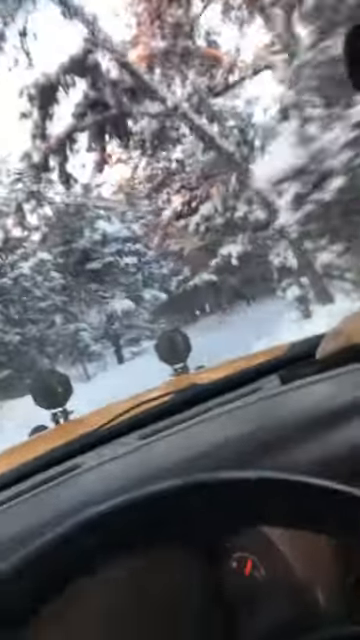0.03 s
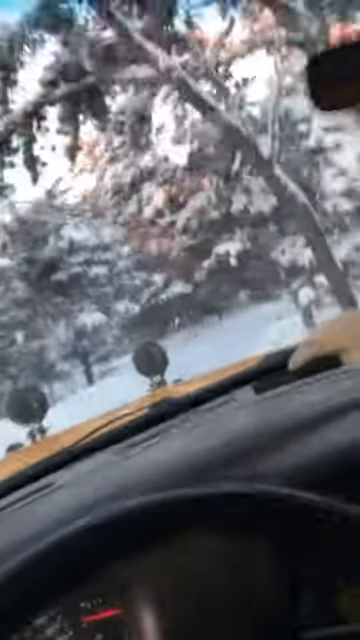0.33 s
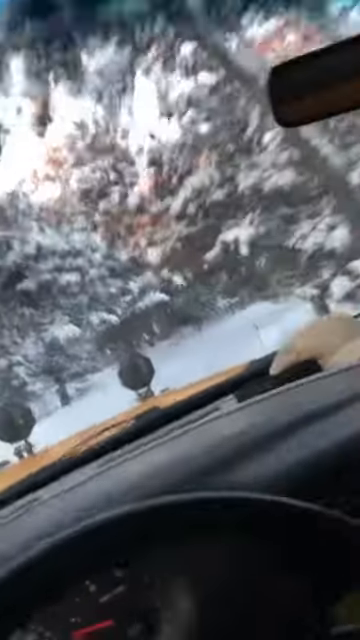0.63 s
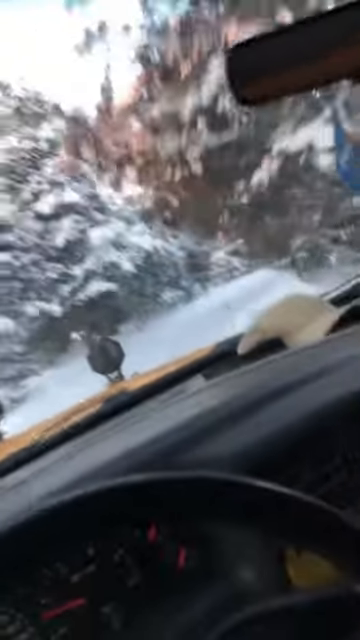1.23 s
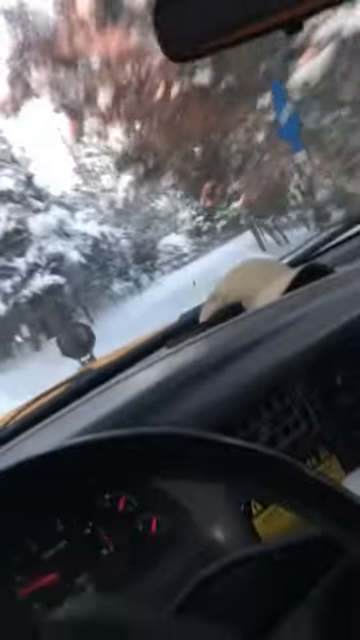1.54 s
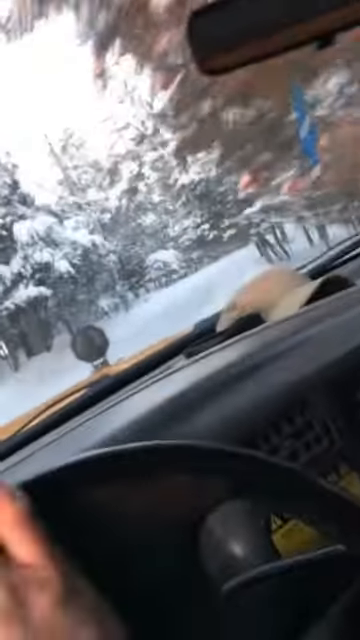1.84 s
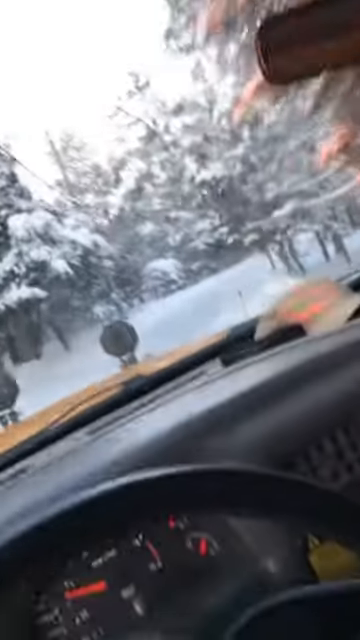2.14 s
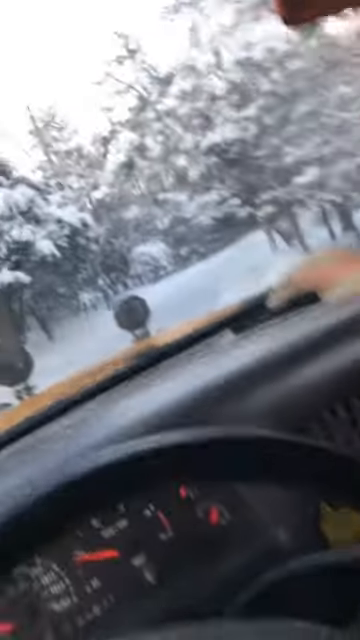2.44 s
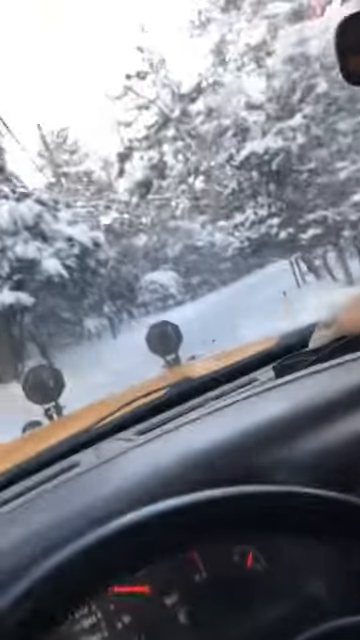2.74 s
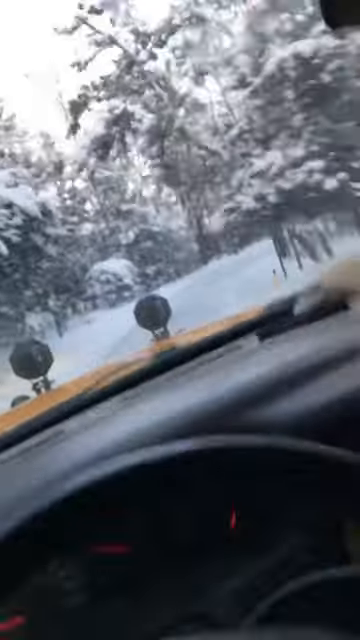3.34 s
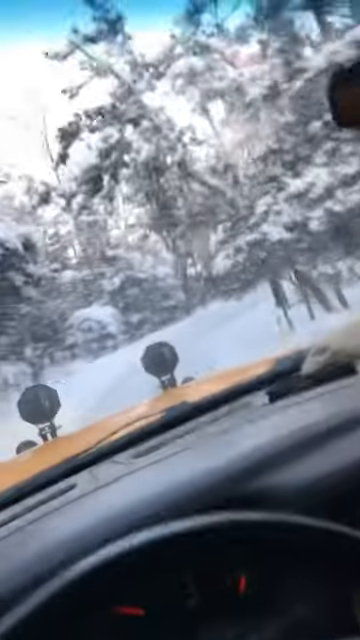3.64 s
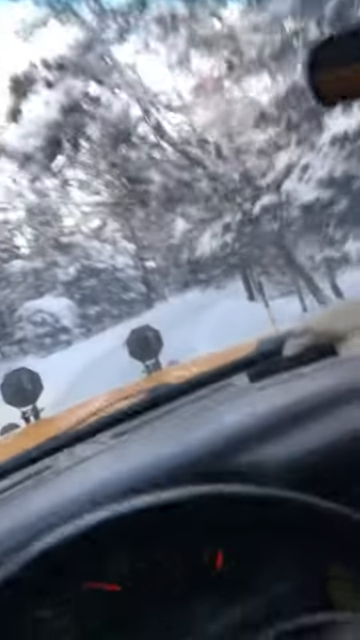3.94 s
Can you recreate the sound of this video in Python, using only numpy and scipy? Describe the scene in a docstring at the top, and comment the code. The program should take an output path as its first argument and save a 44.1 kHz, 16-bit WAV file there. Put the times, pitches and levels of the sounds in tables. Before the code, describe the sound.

A truck engine throbs low, heard from inside the cab on a snowy track, then revs up halfway and pulls. Bumps boom, loose fittings rattle, trim chirps, and a rush of air and snow swells.

```python
"""Inside the cab of a plow truck on a snowy track, the engine throbs slowly, then revs up and pulls.
The cab rumbles, growls and booms over bumps, and the belt-driven fan hums along with the engine.
The rush of air and snow swells as the truck speeds up. Loose fittings rattle, rubbing trim chirps,
and something brushes softly close by."""
import sys
import numpy as np
from scipy import signal
from scipy.fft import rfft, irfft, next_fast_len
from scipy.io import wavfile
from scipy.ndimage import uniform_filter1d, map_coordinates

SR = 44100
rng = np.random.default_rng(int(sys.argv[2]) if len(sys.argv) > 2 else 0)


def put_to_file(sound):
    """Save the sound as 16-bit audio at rate SR, in the file named by the first command-line argument."""
    columns = np.atleast_2d(sound).T  # one column per channel
    safe = np.clip(columns, -1, 1)
    whole_steps = np.round(safe * 32767)
    wavfile.write(sys.argv[1], SR, whole_steps.astype(np.int16))


N = 176400


# How often the engine fires (time [s], firing rate [Hz])
FIRING_RATE = [(0, 43.95), (.45, 42.99), (1.15, 43.84), (1.62, 43.48), (1.76, 46.26), (1.86, 53.77),
               (1.96, 64.74), (2.06, 66.86), (2.3, 68.78), (2.65, 69.83), (2.85, 73.16), (3.05, 75.55),
               (3.2, 77.3), (3.4, 76.23), (3.75, 80.6), (4, 81.6)]
def engine_speed(idle_hz=42.7, pull_hz=70.4):
    """The phase turns once per firing; pull goes from 0 (idling) to 1 (working hard)."""
    rate = curve(FIRING_RATE)
    phase = 2 * np.pi * np.cumsum(rate) / SR
    pull = np.clip((rate - idle_hz) / (pull_hz - idle_hz), 0, 1)
    return phase, pull


# How loud the engine's lowest tone is (time [s], level [dB])
THROB_LEVEL = [(0, -18), (.12, -14.5), (.8, -14.5), (1.25, -14.5), (1.65, -13.5), (1.88, -20), (2.03, -18),
               (2.55, -19.5), (2.8, -17.5), (2.95, -14), (3.3, -15.5), (3.6, -16.5), (3.8, -18.5),
               (3.9, -29), (4, -18)]
# Its higher tones (multiple of the firing rate, idling level [dB], pulling level [dB])
ENGINE_OVERTONES = [(2, -22, -34), (3, -63, -58), (4, -38, -54.5), (5, -34.5, -65)]
def engine(phase, pull, jitter_rad=0.15):
    """Uneven firings throb in the cab; most of the higher tones fade as the engine speeds up."""
    phase = phase + jitter_rad * wobble(14)
    out = amp(curve(THROB_LEVEL) + 1.36 * wobble(22.24)) * unit(np.cos(phase))
    for multiple, idle_db, pull_db in ENGINE_OVERTONES:
        level_db = blend(idle_db, pull_db, pull) + 1.6 * wobble(8.1)
        out += amp(level_db) * unit(np.cos(multiple * phase))
    return out


# The rumble while idling (frequency [Hz], relative level [dB])
IDLE_SPECTRUM = [(12, -36), (20, -11), (27, 5.5), (37, 3), (60, 1.5), (76, -2.5), (100, -14), (130, -12.5),
                 (200, -16), (250, -16.5), (310, -19), (400, -27), (600, -38), (1200, -82)]
# The rumble while pulling (frequency [Hz], relative level [dB])
PULL_SPECTRUM = [(12, -36), (20, -10), (30, 7), (40, 5.5), (60, 0), (80, -4), (98, -7.5), (130, -12),
                 (200, -11), (250, -16), (310, -19.5), (400, -26.5), (600, -37.5), (1200, -102)]
# The cab's hollow boom (frequency [Hz], relative level [dB])
BOOM_SPECTRUM = [(20, -76), (70, -55), (98, 2), (112, 5), (130, 8), (150, -11), (175, 1.5), (205, -3.5),
                 (240, -53), (330, -34), (900, -120)]
def rumble(pull, swell_db=1, lump_db=1):
    """The body shakes on the track, harder when the truck pulls; the cab booms in uneven lumps."""
    idling = np.sqrt(1 - pull) * amp(-20) * noise(IDLE_SPECTRUM)
    pulling = np.sqrt(pull) * amp(-17) * noise(PULL_SPECTRUM)
    boom = unit(noise(BOOM_SPECTRUM) * amp(lump_db * wobble(17)))
    shake = (idling + pulling) * amp(swell_db * wobble(17))
    return shake + amp(blend(-28.5, -28, pull)) * boom


# Bumps in the track (time [s], peak level [dB], pitch [Hz])
BUMPS = [(0.278, -17, 142.2), (0.887, -14.5, 140.7), (1.01, -13.5, 124), (1.124, -14, 128.5),
         (1.228, -15, 126.8), (1.672, -15, 142), (1.752, -18, 155.5), (1.958, -16.5, 135), (2.26, -13, 125),
         (2.321, -22, 190), (2.367, -17, 150.1), (2.443, -15.5, 125), (2.483, -15, 137.7),
         (2.707, -13.5, 139.3), (2.836, -19, 149.3), (3.0, -18.5, 113.4), (3.081, -19.5, 154),
         (3.212, -15, 124.7), (3.279, -19, 142), (3.401, -20, 146), (3.473, -17.5, 144),
         (3.54, -14.5, 123.5), (3.715, -15.5, 141), (3.781, -15.5, 147.9), (3.89, -18.5, 165.5)]
def bumps(rise_s=0.023):
    """Each bump makes the cab ring with a low note that swells and dies within a few cycles."""
    t, out = clock(), np.zeros(N)
    for start, db, hz in BUMPS:
        age = np.maximum(t - start, 0)
        swell = (age / rise_s * np.exp(1 - age / rise_s)) ** 2
        out += amp(db) * swell * np.sin(2 * np.pi * (hz * age + rng.random()))
    return out


# The fan's hum, at the rate its blades pass (time [s], level [dB])
FAN_HUM = [(0, -34), (1.6, -33.5), (1.9, -31.5), (2.2, -39.5), (2.36, -28), (2.46, -39), (2.9, -36.5),
           (3.17, -35.5), (3.36, -30.5), (3.45, -23), (3.6, -33), (3.71, -47), (3.8, -29.5), (4, -33)]
# The fan's whine, at twice that rate (time [s], level [dB])
FAN_WHINE = [(0, -45), (.27, -37), (.45, -53), (.68, -38.5), (.88, -44.5), (1.15, -36), (1.6, -47),
             (1.88, -49), (2.08, -38.5), (2.16, -50), (2.23, -41), (2.34, -44.5), (2.68, -46),
             (2.79, -39.5), (2.86, -49), (3.05, -42), (3.12, -36.5), (3.23, -37), (3.35, -45.5),
             (3.45, -38), (3.63, -38.5), (3.73, -43), (3.78, -50), (4, -41.5)]
def fan(phase, pull, blades_per_firing=3.585, waver_rad=0.34, flutter_db=1):
    """A belt from the engine turns the fan, whose blades make three wavering, slightly rough tones."""
    out, blade_phase = np.zeros(N), blades_per_firing * phase
    levels_db = [curve(FAN_HUM), curve(FAN_WHINE), blend(-48, -59, pull)]
    for multiple, db in enumerate(levels_db, 1):
        tone = unit(np.sin(multiple * blade_phase + waver_rad * wobble(7)))
        roughness = 0.5 * fuzzy_tone(multiple * blade_phase, width_hz=36)
        out += amp(db + flutter_db * wobble(21.97)) * unit(tone + roughness)
    return out


# How loud the growl is (time [s], level [dB])
GROWL_SURGES = [(0, -42), (.36, -40), (.46, -29.5), (.8, -36), (1.0, -31), (1.35, -39.5), (1.7, -43),
                (2.3, -34), (2.5, -42.5), (3.35, -39), (3.55, -24.5), (3.7, -39), (3.92, -27.5), (4, -34)]
# Its tone, strongest near 220 Hz (frequency [Hz], relative level [dB])
GROWL_SPECTRUM = [(150, -54), (195, -2), (218, -2), (240, -5), (290, -35), (500, -100)]
def growl():
    """A low growl comes in surges, pitched just above the cab's boom."""
    return amp(curve(GROWL_SURGES)) * noise(GROWL_SPECTRUM)


# The tone of the rushing air and snow (frequency [Hz], relative level [dB])
RUSH_SPECTRUM = [(150, -1.5), (350, 2), (480, 3.5), (650, 0.5), (850, 2.1), (990, 1.5), (1035, 2.5),
                 (1150, 3), (1250, 0), (1380, -3.5), (1580, -2.5), (1850, -2.5), (2350, -2.5), (2950, -6),
                 (3120, -8), (3260, -17), (4500, -20), (8000, -49)]
# How the rush swells (time [s], relative level [dB])
RUSH_SWELL = [(0.0, -39.5), (0.22, -40.5), (1.83, -41.5), (2.02, -38.5), (2.42, -36), (4.0, -35.5)]
# The tone of the hiss on top (frequency [Hz], relative level [dB])
HISS_SPECTRUM = [(1500, -8), (3200, 1), (4200, 1.1), (4900, -3.5), (5400, 1.5), (6000, -1.1), (6700, 1),
                 (7700, -1.4), (9200, -2.2), (10200, -11.5), (11200, -6), (12500, -7), (13500, -22),
                 (15500, -20)]
# How the hiss swells (time [s], relative level [dB])
HISS_SWELL = [(0.0, -53), (0.73, -55), (1.66, -55.5), (2.35, -49), (2.7, -50), (2.93, -48), (3.59, -49),
              (4.0, -47)]
def rush(phase):
    """Air and snow rush past with a fine, gritty hiss, pulsing slightly as the engine fires."""
    pulse_db = 0.74 * np.cos(phase)
    air_db = curve(RUSH_SWELL) + 0.3 + pulse_db + 0.37 * wobble(24.66)
    air = amp(air_db) * patchy(noise(RUSH_SPECTRUM), depth_db=1)
    hiss = patchy(noise(HISS_SPECTRUM), depth_db=2)
    grain_db = 0.9 * wobble(900) + 1.5 * wobble(45)
    grit = unit(hiss * amp(grain_db + pulse_db))
    return air + amp(curve(HISS_SWELL) - 0.1) * grit


# The bright tick of a loose fitting (frequency [Hz], relative level [dB])
TICK_SPECTRUM = [(1500, -15), (3300, 2), (4500, -0.5), (6300, 2), (7200, 2), (9000, 4), (10200, -1),
                 (11500, 0.5), (13000, -6), (15500, -41)]
# Its lower clack (frequency [Hz], relative level [dB])
CLACK_SPECTRUM = [(250, -10), (700, 10.5), (1500, 12), (2200, 1.5), (3000, 7), (3600, 0), (7000, -19)]
# The notes it rings at (pitch [Hz], width [Hz], relative level [dB])
RING_NOTES = [(1680, 250, -8), (2210, 290, -2.5), (2795, 450, -3.5)]
# Each rattle (time [s], tick level [dB], time the taps span [s], clack level [dB], ring level [dB])
RATTLE_EVENTS = [(0.09, -37.5, 0.0069, -42, -30), (0.963, -45, 0.015, -39, -40),
                 (0.985, -44, 0.021, -35, -41), (1.017, -47.5, 0.019, -39, -39),
                 (1.612, -43, 0.0077, -35.5, -43), (1.79, -48, 0.0081, -44, -52),
                 (1.834, -46, 0.0068, -36.5, -41), (2.21, -45.5, 0.0082, -40, -42),
                 (2.266, -47, 0.013, -41, -41), (2.41, -37, 0.0092, -37, -37.5),
                 (2.594, -43, 0.025, -37, -43), (2.774, -42.5, 0.042, -36, -38),
                 (2.98, -39, .005, -43, -43), (2.988, -41, 0.0038, -42, -35.5),
                 (3.181, -43.5, 0.0096, -34, -35.5), (3.331, -37.5, 0.0088, -35.5, -43),
                 (3.343, -41.5, 0.025, -40, -36)]
def rattles(taps_per_s=700, scatter_db=3.5, rise_s=0.0015, decay_s=0.05):
    """Loose fittings rattle in short runs of tiny taps, each dying away quickly in the cab."""
    t, out = clock(), np.zeros(N)
    tick, clack = noise(TICK_SPECTRUM), noise(CLACK_SPECTRUM)
    ring = unit(sum(amp(db) * fuzzy_tone(2 * np.pi * hz * t, width) for hz, width, db in RING_NOTES))
    age = t[:SR // 6]
    for start, tick_db, span, clack_db, ring_db in RATTLE_EVENTS:
        place, strength = rng.random(32), rng.standard_normal(32)
        count = int(np.clip(span * taps_per_s, 2, 32))
        tap_times = np.append(0, span * place[1:count])
        tap_age = age - tap_times[:, None]  # one row per tap
        tap_db = scatter_db * strength[:count, None] - 60 * np.abs(tap_age) / decay_s
        power = ((tap_age >= 0) * amp(tap_db) ** 2).sum(0)
        shape = np.interp(t - start, age, np.sqrt(power / power.max()), left=0, right=0)
        shape *= np.clip((t - start) / rise_s, 0, 1)
        out += shape * (amp(tick_db) * tick + amp(clack_db) * clack + amp(ring_db) * ring)
    return out


# Each chirp of the trim (time [s], relative level [dB], pitch [Hz], half its length [s])
TRIM_CHIRPS = [(0.123, -45, 6600, 0.026), (0.92, -46, 6440, 0.046), (1.782, -48, 6300, 0.04),
               (1.822, -43.5, 6600, 0.028), (2.253, -43, 6300, .02), (2.483, -42, 6200, .024),
               (2.726, -42.5, 6200, 0.019), (2.864, -39, 6776, 0.021), (3.068, -46, 6750, 0.021),
               (3.61, -44, 6270, .04), (3.656, -40.5, 6860, 0.026)]
def chirps(width_hz=810, octave_db=-14, scratch_db=-5.5):
    """The cab's trim rubs in brief, high, scratchy squeaks."""
    t, out = clock(), np.zeros(N)
    # Fast random wobbles blur the note and the octave above it.
    blur, octave_blur = [wobble(k * width_hz) + 1j * wobble(k * width_hz) for k in (1, 2)]
    scratch = amp(scratch_db) * unit(noise(TICK_SPECTRUM) * amp(1.2 * wobble(500)))
    for start, db, hz, half_length in TRIM_CHIRPS:
        on = (t > start) & (t < start + 2 * half_length)
        tone = np.exp(2j * np.pi * hz * t[on])
        squeak = (blur[on] * tone + amp(octave_db) * octave_blur[on] * tone ** 2).real
        shape = np.interp((t[on] - start) / half_length, [0, .3, .7, 1.1, 2], [.011, .84, .49, .2, 0])
        out[on] += amp(db) * shape * (squeak + scratch[on])
    return out


# The tone of the brushing (frequency [Hz], relative level [dB])
BRUSH_SPECTRUM = [(3000, 3), (6000, -3.5), (9000, 6.5), (10300, -2), (12000, 2.5), (14300, -3),
                  (15600, -10)]
# Each stroke (time of the peak [s], level [dB], fade time [s], lower edge [Hz])
BRUSH_STROKES = [(0.06, -54, .04, 10000), (.275, -46.5, 0.044, 8000), (0.446, -41.5, 0.041, 8300),
                 (.635, -56, 0.046, 9500), (0.836, -44.5, 0.03, 8000), (.995, -58, 0.042, 10000),
                 (1.362, -64, 0.049, 12080), (2.151, -49, 0.026, 11900), (2.96, -46, 0.021, 12120),
                 (3.275, -53, 0.045, 11880), (3.91, -43.5, 0.057, 11100), (3.99, -48, 0.037, 11240)]
def brushes(grain_db=1, leak=0.33):
    """Something brushes close by in soft, very high swishes that swell and fade."""
    t, out = clock(), np.zeros(N)
    rub = noise(BRUSH_SPECTRUM) * amp(grain_db * wobble(1000))
    for peak, db, fade, edge_hz in BRUSH_STROKES:
        # Below the edge, only a little of the sound leaks through.
        swish = unit(filtered(rub, lambda hz: leak + (1 - leak) / (1 + (edge_hz / (hz + 1)) ** 20)))
        out += amp(db) * np.exp(-2 * ((t - peak) / fade) ** 2) * swish
    return out


# Faint notes in the rush (pitch [Hz], width [Hz], idling level [dB], pulling level [dB])
AIR_NOTES = [(1034, 28, -58.5, -51), (1460, 50, -59.5, -62), (1580, 50, -68, -53), (2448, 50, -58, -55),
             (2882, 25, -64.5, -57), (3115, 50, -62, -63), (6250, 70, -69, -83)]
def singing_air(pull, flicker_db=2.5):
    """Thin ringing notes come and go in the moving air."""
    t, out = clock(), np.zeros(N)
    for hz, width, idle_db, pull_db in AIR_NOTES:
        level_db = blend(idle_db, pull_db, pull) + flicker_db * wobble(14)
        out += amp(level_db) * fuzzy_tone(2 * np.pi * hz * t, width)
    return out


def amp(db):
    """Turn decibels into a number to multiply by."""
    return 10 ** (np.asarray(db) / 20)


def unit(x):
    """Scale a sound to an average power of 1."""
    return x / np.sqrt(np.mean(x ** 2) + 1e-20)


def blend(idling, pulling, pull):
    """Slide from the idling value to the pulling value."""
    return idling + (pulling - idling) * pull


def clock():
    """The time of every sample, in seconds."""
    return np.arange(N) / SR


def curve(rows):
    """Join (time [s], value) points with straight lines."""
    return np.interp(clock(), *np.transpose(rows))


def wobble(rate):
    """A smooth curve through `rate` random points a second."""
    return map_coordinates(rng.standard_normal(N // 4), [clock() * rate + 2], mode="wrap")


def filtered(x, response):
    """Turn each frequency up or down by response(hz)."""
    size = next_fast_len(N + SR // 2)
    return irfft(rfft(x, size) * response(np.fft.rfftfreq(size, 1 / SR)), size)[:N]


def noise(spectrum):
    """Noise shaped by (frequency [Hz], relative level [dB]) points."""
    freqs, db = np.transpose(spectrum)
    white = rng.standard_normal(N)
    return unit(filtered(white, lambda hz: amp(np.interp(np.log(hz + 1), np.log(freqs), db))))


def patchy(x, depth_db):
    """Make random patches of time and frequency louder or softer."""
    grid = signal.stft(x, nperseg=512)[2]
    patches = uniform_filter1d(rng.standard_normal(grid.shape), size=5, axis=0)
    patches = uniform_filter1d(patches, size=12, axis=1)
    return unit(signal.istft(grid * amp(depth_db * unit(patches)), nperseg=512)[1][:N])


def fuzzy_tone(phase, width_hz):
    """A narrow band of noise around the pitch that the phase sets."""
    return unit(wobble(width_hz) * np.cos(phase) + wobble(width_hz) * np.sin(phase))


def scene():
    """Engine speed drives the tones and the rumble; bumps and small noises ride on top."""
    phase, pull = engine_speed()
    truck = engine(phase, pull) + fan(phase, pull) + rumble(pull) + growl()
    air = rush(phase) + singing_air(pull)
    return (truck + air + bumps() + rattles() + chirps() + brushes())[None]


def record(dry):
    """Fade the sound in quickly and cut off the very highest treble."""
    fade_in_s, top_hz = 0.01, 15700
    faded = dry[0] * np.minimum(clock() / fade_in_s, 1)
    return filtered(faded, lambda hz: hz < top_hz)[None]


dry = scene()
out = record(dry)
put_to_file(out)
```